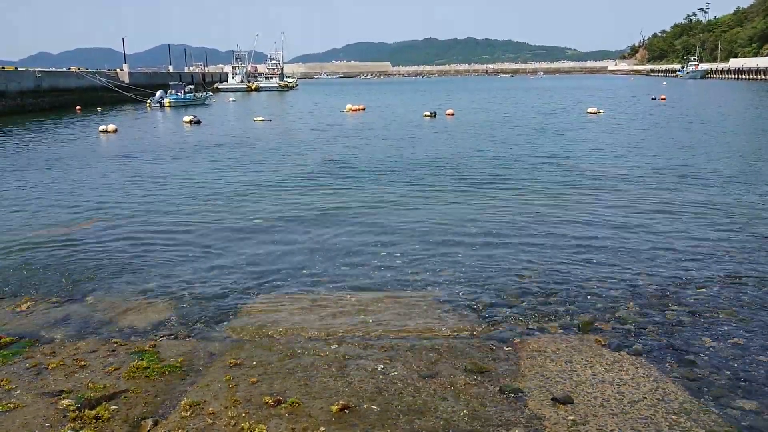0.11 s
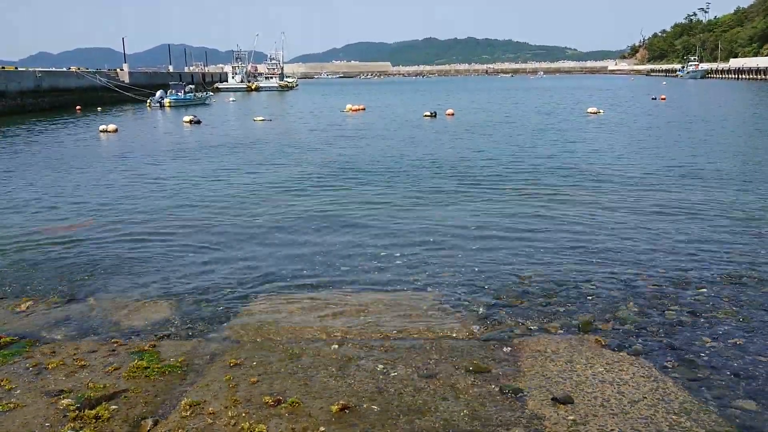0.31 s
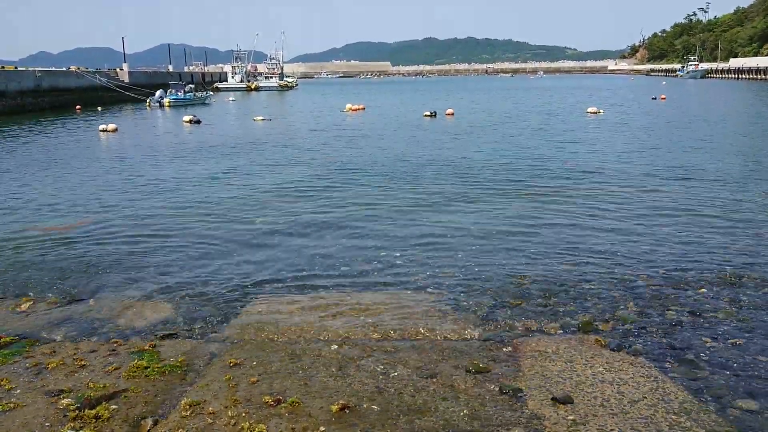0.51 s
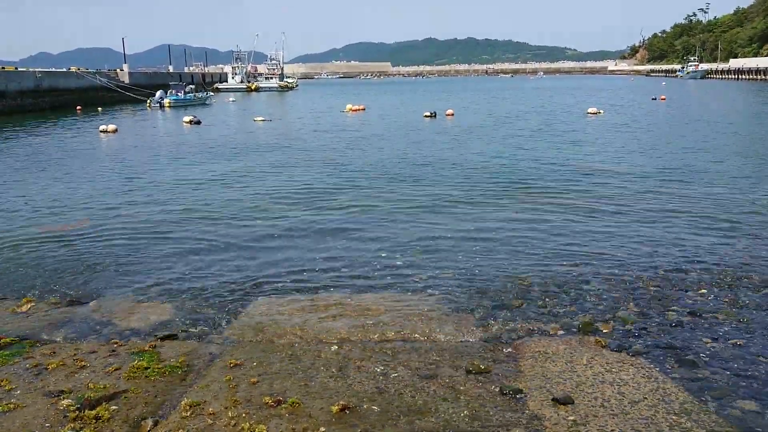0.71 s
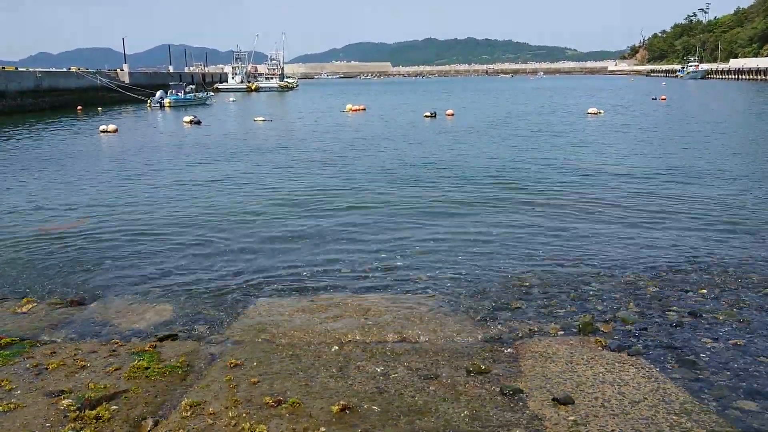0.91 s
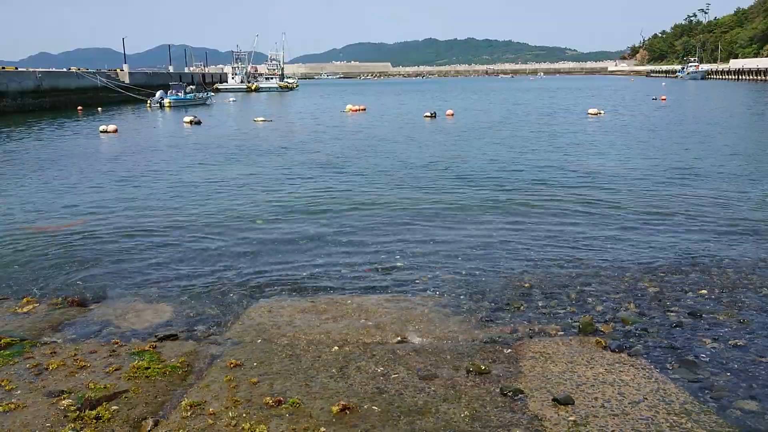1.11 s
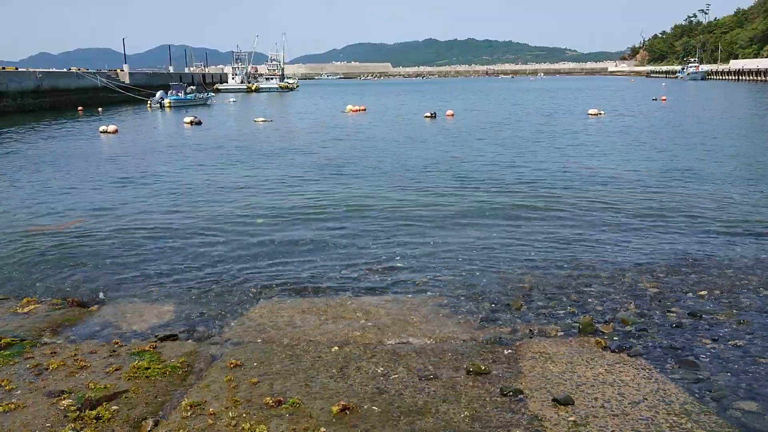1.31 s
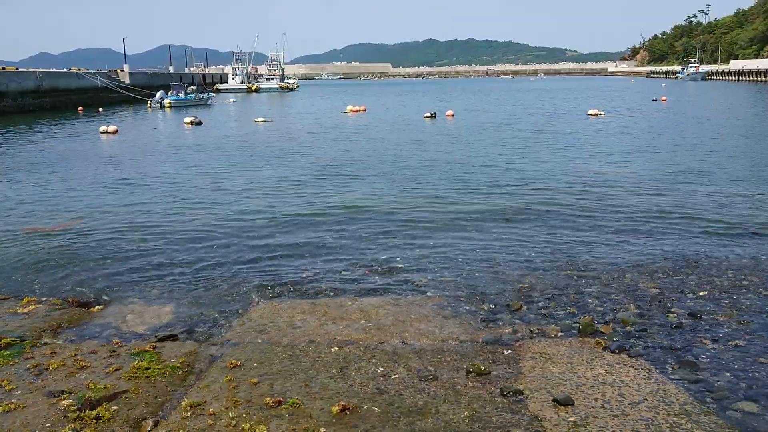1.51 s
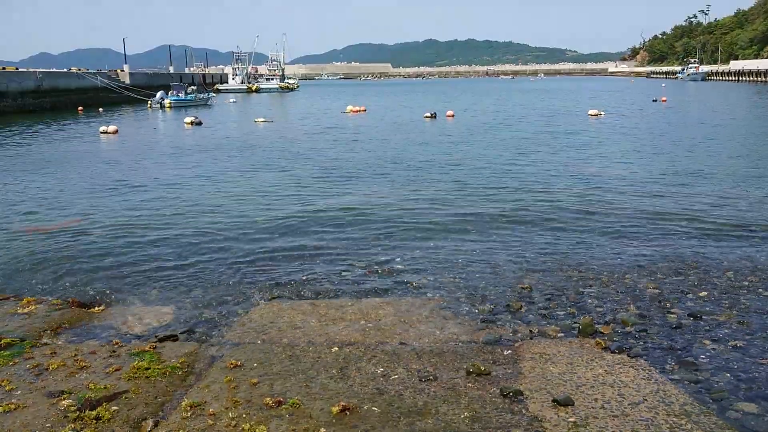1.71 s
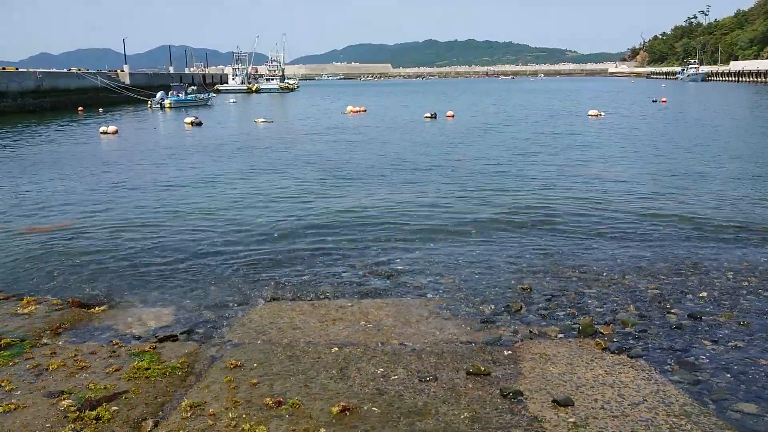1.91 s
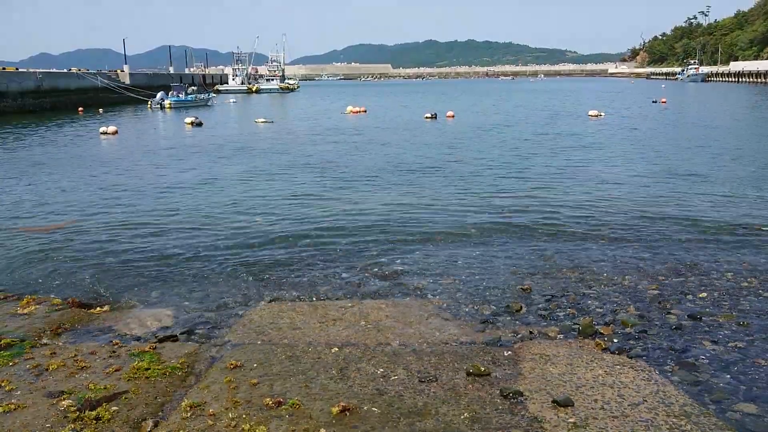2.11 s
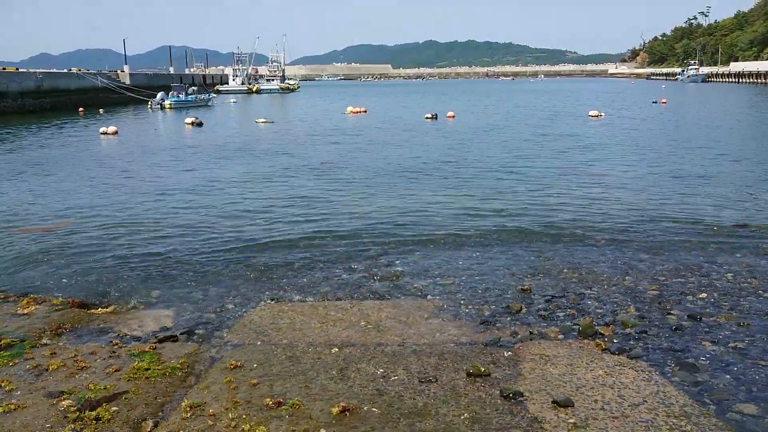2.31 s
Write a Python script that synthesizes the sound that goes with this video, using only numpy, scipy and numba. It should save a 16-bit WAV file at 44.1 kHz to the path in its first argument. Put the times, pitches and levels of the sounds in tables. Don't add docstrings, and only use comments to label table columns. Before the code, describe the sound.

Wind gust buffets the microphone with heavy low thumps over softly fizzing wavelets on a slipway

```python
import sys
import numpy as np
from scipy import signal
from scipy.io import wavfile
from scipy.ndimage import uniform_filter1d
from numba import njit

SR = 44100
rng = np.random.default_rng(int(sys.argv[2]) if len(sys.argv) > 2 else 0)


def elevation(decibels):
    levels = np.asarray(decibels, float)
    return 10 ** (levels / 20)


def wav_record(signal):
    frames = np.transpose(np.atleast_2d(signal))
    bounded = np.clip(frames, -1, 1)
    quanta = np.round(bounded * 32767).astype(np.int16)
    wavfile.write(sys.argv[1], SR, quanta)


N = 110250

# peak_s, length_s, level_db
BUFFETS_LEFT = [(.024, 0.031, -47), (.124, 0.016, -37), (.233, 0.021, -24), (.29, 0.019, -27),
                (.329, 0.012, -16), (.446, 0.018, -13.5), (.514, 0.14, -20.5), (.555, 0.014, -17),
                (.632, 0.019, -15.5), (.68, 0.24, -30), (.772, 0.025, -11), (.796, 0.011, -4.5),
                (.86, 0.024, -27), (.918, 0.046, -38), (1.04, 0.037, -29), (1.18, 0.14, -46),
                (1.52, 0.063, -53), (1.608, 0.057, -49), (1.725, 0.021, -32), (1.765, 0.016, -33.5),
                (1.822, 0.025, -40), (1.945, 0.046, -33), (2.06, 0.16, -48), (2.17, 0.11, -43),
                (2.261, 0.019, -33), (2.32, 0.078, -39.5), (2.391, 0.049, -43.5), (2.468, 0.1, -37)]
BUFFETS_RIGHT = [(.053, 0.082, -39), (.129, 0.025, -30), (.201, 0.032, -26.5), (.233, 0.014, -16.5),
                 (.31, 0.061, -35), (.364, 0.014, -20.5), (.4, 0.0084, -17), (.431, 0.043, -26.5),
                 (.514, 0.017, -25), (.56, 0.052, -24), (.6, 0.019, -21.5), (.66, 0.031, -19),
                 (.72, 0.083, -23.5), (.864, 0.019, -45), (.94, 0.062, -38), (1.001, 0.073, -37.5),
                 (1.111, 0.039, -26.5), (1.208, 0.031, -28), (1.31, 0.058, -49), (1.636, 0.029, -45),
                 (1.797, 0.1, -50), (1.971, 0.039, -43), (2.074, 0.052, -44), (2.39, 0.092, -64),
                 (2.49, 0.027, -52)]
# time_s, peak_db, width_ms
KICKS_LEFT = [(0.2238, -38, 1.4), (0.238, -53, 0.93), (0.3032, -40, 1.5), (0.3151, -44, 1.2),
              (0.323, -22.5, 1.24), (0.4207, -22.5, 0.39), (0.424, -23, 0.86), (0.4462, -15, 1.0),
              (0.457, -28.5, 1.4), (.478, -27, 1.5), (.4887, -13.5, 0.57), (.494, -17.5, 0.53),
              (0.511, -8, 1.2), (0.5132, -8, 1.04), (0.5208, -21.5, 0.78), (0.541, -29, 1.1),
              (0.5466, -14.5, 0.62), (0.5599, -14.5, 0.48), (0.5985, -23, 2.3), (0.6092, -28, 0.47),
              (.613, -11, 0.46), (0.6206, -7.5, 0.75), (0.624, -17, 0.72), (0.7378, -26, 1.3),
              (.745, -15, 0.65), (0.756, -18, .8), (0.7612, -10.5, .8), (0.764, -11.5, 0.63),
              (.7687, -8, 0.44), (.7787, -24, 0.64), (0.7887, -17, 1.1), (0.828, -45, 1.2),
              (0.8357, -43, 1.3), (0.842, -28.5, 1.7), (0.9126, -57, 1.2), (1.2019, -43, 1.2),
              (1.93, -50.5, 2.2), (1.54, -50.5, 1.8), (2.029, -48, 1.5)]
KICKS_RIGHT = [(0.049, -28.5, 1.55), (0.1206, -43, 1.5), (0.2002, -38, 2), (0.2189, -31, 1.1),
               (0.2306, -28.5, 1.4), (0.3548, -33, 1.2), (0.3748, -33, 0.63), (.3796, -29, 1),
               (0.3904, -30.5, 1.2), (0.3982, -30, 1.1), (0.423, -27, 1.9), (0.4335, -19.5, 0.43),
               (.459, -29, 0.9), (.553, -31, 1.6), (.612, -21.5, 1.3), (0.6283, -18, 1),
               (0.6389, -6.5, 0.27), (.6487, -16.5, 0.42), (0.6814, -15.5, 1.26), (0.6898, -14, 0.63),
               (0.7, -19.5, .9), (0.7077, -16.5, 0.68), (0.718, -25, 1.1), (0.74, -23, 0.61),
               (0.8622, -25.5, 1.6), (.874, -33.5, 1.4), (0.9402, -39, 2.6), (.9774, -48, 2.3),
               (1.116, -41, 1.2), (1.1238, -36, 1.9), (1.1652, -38, 1.5), (1.177, -41, 1.3),
               (1.2048, -39, 1.4), (1.2108, -31.5, 0.99), (2.361, -47, 1.3), (2.445, -51, 1.1)]
BREEZE_DB = [-47.5, -53.5]
# start_s, peak_db, pitch_hz
PLOPS = [(0.464, -30.5, 2110), (0.843, -29, 1510), (0.854, -31.5, 2290), (1.016, -37, 1860),
         (1.03, -36, 2680), (1.282, -33, 1405), (1.294, -34, 1657), (1.348, -32, 2180), (1.372, -39, 890),
         (1.389, -40.5, 574), (1.505, -44.5, 620), (1.626, -36, 1070), (1.747, -39, 772),
         (1.797, -41.5, 880), (1.822, -34, 2050), (1.85, -41, 835), (2.06, -33.5, 2150),
         (2.08, -26.5, 2200), (2.332, -30.5, 1530), (2.41, -40, 1920), (.004, -41, 2730), (.066, -41, 1500),
         (0.089, -41, 1610), (0.121, -48, 1500), (.124, -47, 725), (.218, -39.5, 890), (.245, -43, 720),
         (.245, -44, 1850), (.277, -47, 1920), (0.324, -33.5, 1830), (.375, -35, 2130),
         (1.375, -32.5, 2070), (1.518, -50, 2170), (1.633, -40, 1320), (1.671, -39.5, 1390),
         (1.862, -38.5, 770), (1.88, -38.5, 1030), (1.924, -47, 972), (1.999, -38, 990),
         (2.072, -37.5, 1370), (2.083, -34, 1890), (2.128, -41, 707), (2.248, -41, 645), (2.29, -38, 1150),
         (2.339, -35, 1880)]
# start_s, peak_db, pitch_hz
TICKS = [(0.354, -39.5, 9150), (.567, -39, 10300), (0.702, -47.5, 4850), (.852, -50, 6060),
         (.99, -47, 5200), (1.051, -44, 8520), (1.172, -40, 5600), (1.203, -44, 5870), (1.24, -39, 6600),
         (1.33, -38.5, 8630), (1.381, -42, 6330), (1.4852, -38, 5231), (1.541, -41.5, 7050),
         (1.692, -44.5, 8240), (1.797, -38.5, 9400), (1.858, -36.5, 8600), (2.144, -49, 8500),
         (2.18, -39.5, 6290), (2.45, -42, 14300), (0.1526, -44, 4510), (0.4807, -52, 5830),
         (0.502, -44, 4940), (0.892, -58, 6170), (.9428, -55, 6000), (.9707, -58, 5660),
         (1.0181, -45, 7000), (1.3493, -43, 7700), (1.46, -51.5, 6140), (2.077, -42, 14000),
         (2.1157, -42.5, 8300), (2.3406, -42, 5740)]
# time_s, level_db, extra_fizz_db
WASH = [
    (0, -56, -0.5),
    (.5, -53, 0.5),
    (.8, -49.5, 0.5),
    (1.1, -50.5, 0.5),
    (1.24, -49.5, 4),
    (1.4, -50, 1),
    (2.0, -51, 0),
    (2.3, -51, 0.5),
    (2.5, -48, -1),
]
# pitch_hz, density_db (per Hz)
WASH_COLOUR = [(400, -17), (611, -6), (1710, -2), (2300, -2), (3370, -10.5), (7580, -11.5), (12500, -20.5),
               (15700, -18)]
# pitch_hz, share (0-1)
LIKENESS = [(300, 0.86), (700, 1), (1400, 0.26), (7000, 0)]
# pitch_hz, lean_db
LEAN = [(600, 4), (1300, 0), (2400, 2), (4400, 2), (8100, 5.5), (15000, 3.5)]

PORT_CUT_HZ, PORT_Q = 53.5, 0.83
RUMBLE_TOP_HZ, EVENNESS = 71.5, 0.86
FLUTTER_DB, FLUTTER_LOW_HZ, FLUTTER_TOP_HZ = -17, 125, 258
FLUTTER_LUMP_DB, LUMP_HZ = 4, 40.7
KICK_HZ, KICK_CUT_HZ = 231.5, 110
LAG_S, LAG_SPREAD_S = 0.00008, 0.0002476
OVERLOAD = 0.75


def rms_one(x):
    return x / np.sqrt(np.mean(x ** 2, axis=-1, keepdims=True) + 1e-20)


def low_pass(x, hz, order):
    return signal.sosfilt(signal.butter(order, hz, fs=SR, output="sos"), x)


def high_pass(x, hz, order):
    return signal.sosfilt(signal.butter(order, hz, "high", fs=SR, output="sos"), x)


def band_pass(x, low_hz, high_hz):
    return signal.sosfilt(signal.butter(2, [low_hz, high_hz], "band", fs=SR, output="sos"), x)


def at_hz(points, hz):
    table_hz, value = np.transpose(points)
    return np.interp(np.log(hz), np.log(table_hz), value)


def drift(rate_hz):
    r = np.exp(-80 * np.pi * rate_hz / SR)
    slow = signal.lfilter([1], [1, -2 * r, r * r], rng.standard_normal(N // 40 + 1002))[1000:]
    return np.interp(np.arange(N) / 40, np.arange(len(slow)), rms_one(slow))


def swell(peak_s, length_s):
    late = (np.arange(N) / SR - peak_s) / length_s
    return np.exp(-4 * np.log(2) * (late * np.where(late < 0, 1.5, 0.85)) ** 2)


def evened(x, share):
    envelope = uniform_filter1d(np.abs(signal.hilbert(x)), size=201)
    return rms_one(x / (envelope + 0.0064 * x.std()) ** share)


def port_cut(x):
    corner = 2 * np.pi * PORT_CUT_HZ
    b, a = signal.bilinear([1, 0, 0], [1, corner / PORT_Q, corner ** 2], SR)
    return signal.lfilter(b, a, x)


def buffet_rumble(level):
    rumble = port_cut(low_pass(rng.standard_normal(N), RUMBLE_TOP_HZ, order=3))
    return low_pass(evened(rumble, EVENNESS) * level, 254, order=3)


def flutter(level):
    lumps = rms_one(low_pass(rng.standard_normal(N), LUMP_HZ, order=2))
    eddies = rms_one(band_pass(rng.standard_normal(N), FLUTTER_LOW_HZ, FLUTTER_TOP_HZ))
    gain = elevation(FLUTTER_DB + FLUTTER_LUMP_DB * lumps) * level ** 1.104
    return low_pass(gain * eddies, 0.99 * FLUTTER_TOP_HZ, order=2)


def pressure_kicks(kicks):
    blows = np.zeros(N)
    for (s, db, width_ms), turn in zip(kicks, rng.random(len(kicks))):
        near = np.arange(int((s - 0.02) * SR), int((s + 0.02) * SR))
        late = near / SR - s
        hump = 1 / np.cosh(1000 * late / width_ms)
        blows[near] += elevation(db + 3.0) * np.cos(2 * np.pi * (KICK_HZ * late + turn)) * hump
    return high_pass(blows, KICK_CUT_HZ, order=2)


def wind(buffets, kicks, breeze_db):
    level = elevation(breeze_db + 2 * drift(3.1))
    for s, length_s, db in buffets:
        level = level + elevation(db) * swell(s - 0.012, length_s)
    return port_cut(buffet_rumble(level) + flutter(level) + pressure_kicks(kicks))


@njit
def add_bubbles(out, start, lag, hz, gain, lean, cycles, rise, sr):
    for k in range(len(start)):
        for c in range(2):
            g = gain[k] * (lean[k] if c == 0 else 1 / lean[k])
            first = start[k] + c * lag[k]
            last = min(int(first + cycles[k] * sr / hz[k]), out.shape[1])
            for i in range(int(first) + 1, last):
                if i >= 0:
                    n = (i - first) * hz[k] / sr
                    envelope = (1 - np.exp(-n / 2.5)) * np.exp(-6.9 * n / cycles[k])
                    out[c, i] += g * envelope * np.sin(2 * np.pi * n * (1 + rise[k] * n / cycles[k]))


def bubbles(s, db, hz, cycles, rise, lag_spread_s):
    out = np.zeros((2, N))
    u = rng.standard_normal((len(s), 4))
    lean = elevation(at_hz(LEAN, hz) / 2 + u[:, 0])
    lag = (LAG_S + lag_spread_s * u[:, 1]) * SR
    own_cycles = cycles * np.exp(0.33 * u[:, 2])
    own_rise = rise * np.exp(0.25 * u[:, 3])
    add_bubbles(out, s * SR, lag, hz, elevation(db), lean, own_cycles, own_rise, float(SR))
    return out


def plops():
    s, db, hz = np.transpose(PLOPS)
    cycles = 22 * (hz / 1500) ** 0.13
    return bubbles(s, db + 5, hz * 0.984, cycles, rise=0.11, lag_spread_s=LAG_SPREAD_S / 10)


def foam_ticks():
    s, db, hz = np.transpose(TICKS)
    ticks = bubbles(s, db + 16, hz, cycles=15.7, rise=0.044, lag_spread_s=LAG_SPREAD_S)
    return ticks * elevation([[1.5], [-5.5]])


def swarm(wash_db, count, low_hz, high_hz, level_db, spread_db, cycles, rise, clump_db, clumps_per_s):
    u = rng.random((count, 3))
    s = u[:, 0] * N / SR
    hz = low_hz * (high_hz / low_hz) ** u[:, 1]
    size_db = -spread_db * np.log(np.maximum(u[:, 2], 0.03))
    moment_db = (wash_db + clump_db * drift(clumps_per_s))[(s * SR).astype(int)]
    colour_db = at_hz(WASH_COLOUR, hz) + 10 * np.log10(hz / 1000)
    return bubbles(s, level_db + moment_db + colour_db + size_db, hz, cycles, rise, LAG_SPREAD_S)


def gurgle(wash_db):
    return swarm(wash_db, count=2600, low_hz=548.3, high_hz=3354, level_db=2.0, spread_db=3.0,
                 cycles=29.1, rise=0.291, clump_db=1.1, clumps_per_s=11.0)


def fizz(fizz_db):
    return swarm(fizz_db, count=4000, low_hz=3355, high_hz=13900, level_db=12.0, spread_db=2.5,
                 cycles=13.37, rise=0.08, clump_db=1.5, clumps_per_s=68.0)


def hiss(patchy_db):
    out, together = 0, drift(6)
    edges = 280 * 2 ** np.arange(0, 6.1, 0.5)
    white = rng.standard_normal((2, 2, N))
    for k, (low, high) in enumerate(zip(edges, edges[1:])):
        mid, side = band_pass(white[k % 2], low, high)
        hz = np.sqrt(low * high)
        alike = at_hz(LIKENESS, hz)
        flicker_db = patchy_db * (0.69 * together + drift(28))
        lean_db = at_hz(LEAN, hz) * np.array([[0.5], [-0.5]])
        stereo = np.sqrt(1 + alike) * mid + np.sqrt(1 - alike) * side * [[1], [-1]]
        out = out + elevation(at_hz(WASH_COLOUR, hz) + flicker_db + lean_db) * stereo
    return out / out.std()


def water():
    s, db, extra_db = np.transpose(WASH)
    t = np.arange(N) / SR
    wash_db = np.interp(t, s, db)
    fizz_db = wash_db + np.interp(t, s, extra_db)
    far_wash = elevation(wash_db - 0.2) * hiss(patchy_db=2.0)
    return plops() + foam_ticks() + gurgle(wash_db) + fizz(fizz_db) + far_wash


def scene():
    left = wind(BUFFETS_LEFT, KICKS_LEFT, BREEZE_DB[0])
    right = wind(BUFFETS_RIGHT, KICKS_RIGHT, BREEZE_DB[1])
    return np.array([left, right]) + water()


def top_cut(x):
    return signal.sosfilt(signal.butter(12, 15800, fs=SR, output="sos"), x)


def record(dry):
    band = high_pass(dry, 38, order=5)
    rounded = OVERLOAD * np.tanh(band / OVERLOAD)
    mix = signal.sosfilt(signal.ellip(10, 0.5, 70, 15750, fs=SR, output="sos"), rounded)
    return top_cut(mix)


dry = scene()
out = record(dry)
wav_record(out)
```